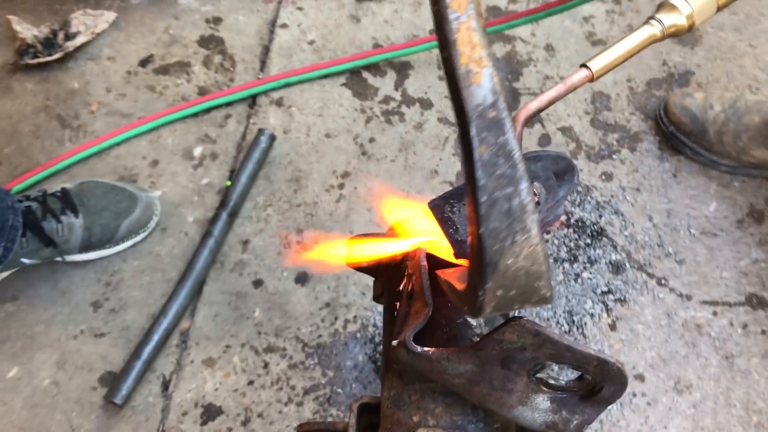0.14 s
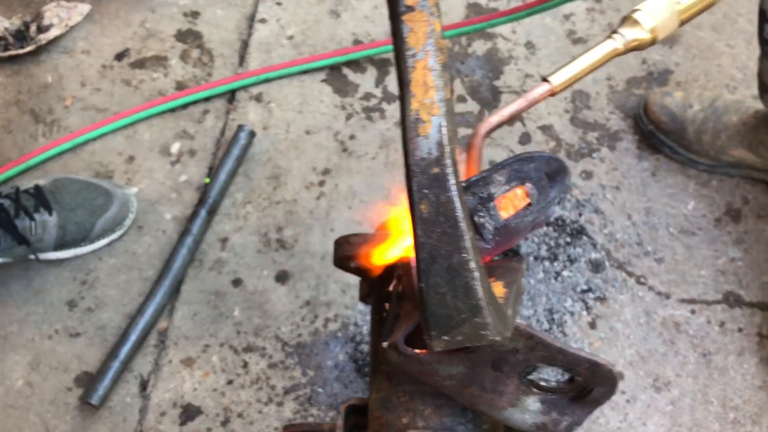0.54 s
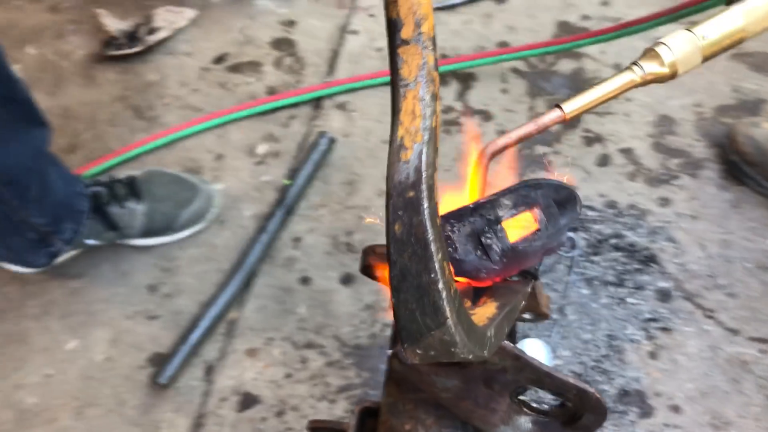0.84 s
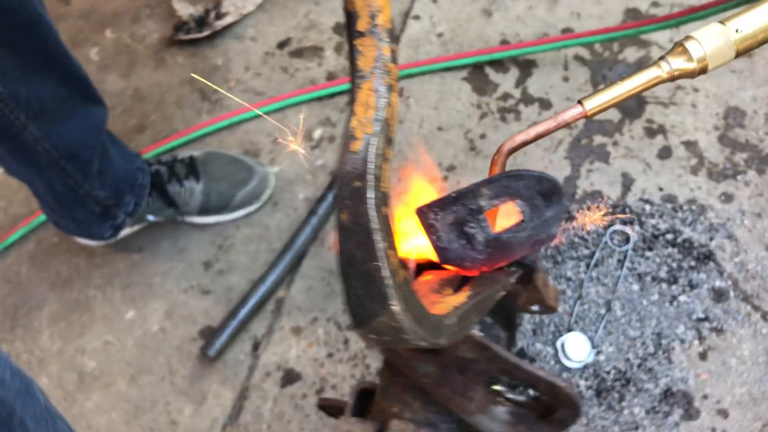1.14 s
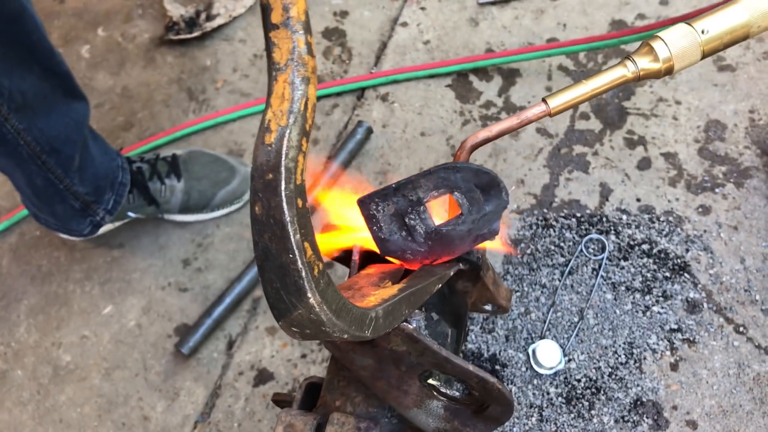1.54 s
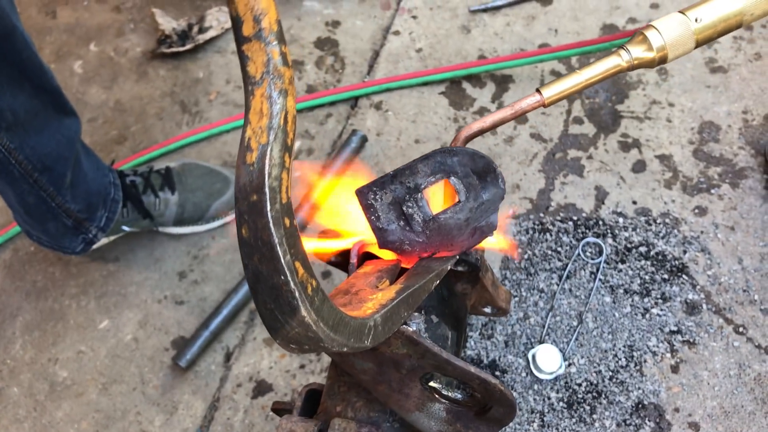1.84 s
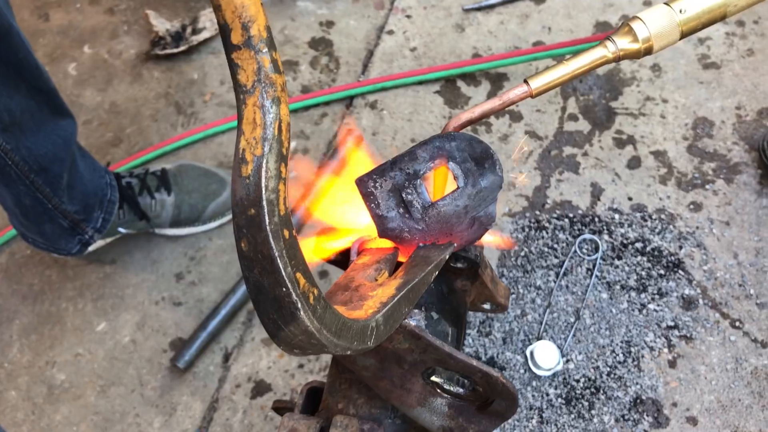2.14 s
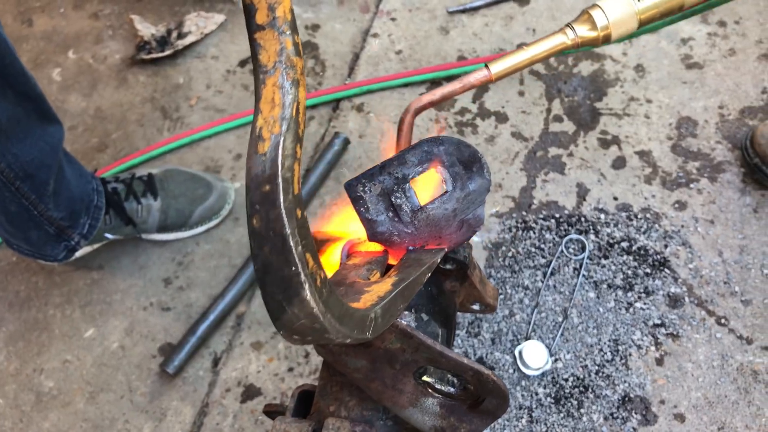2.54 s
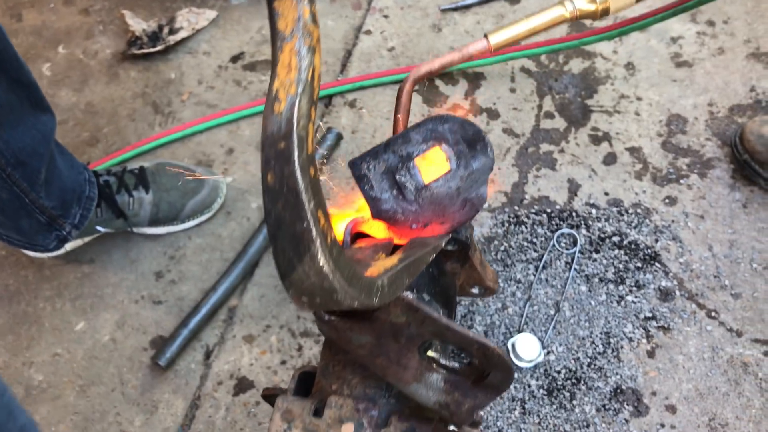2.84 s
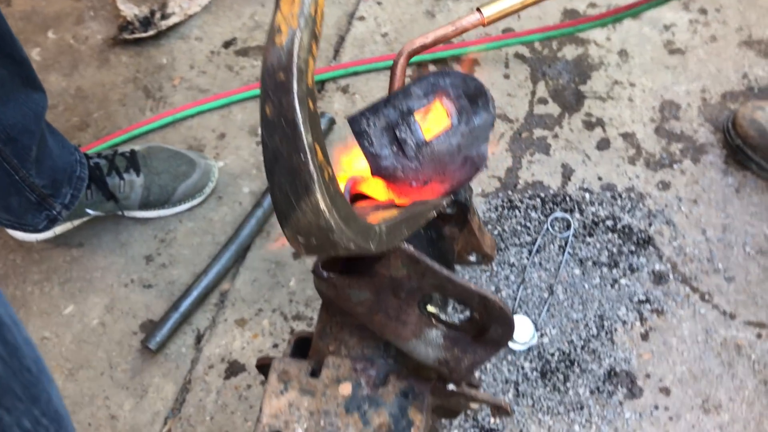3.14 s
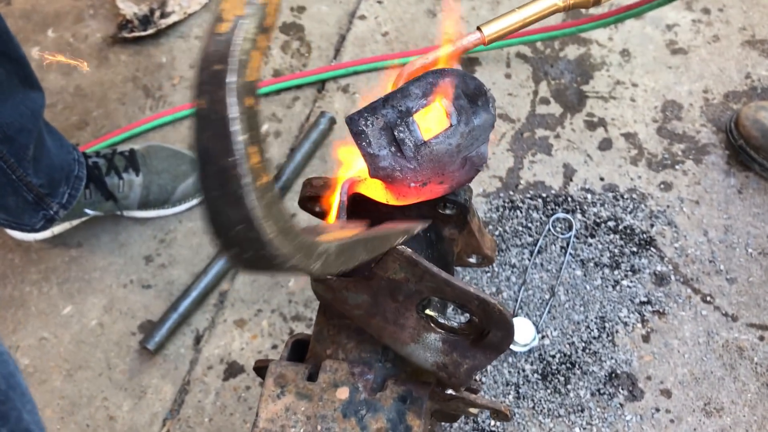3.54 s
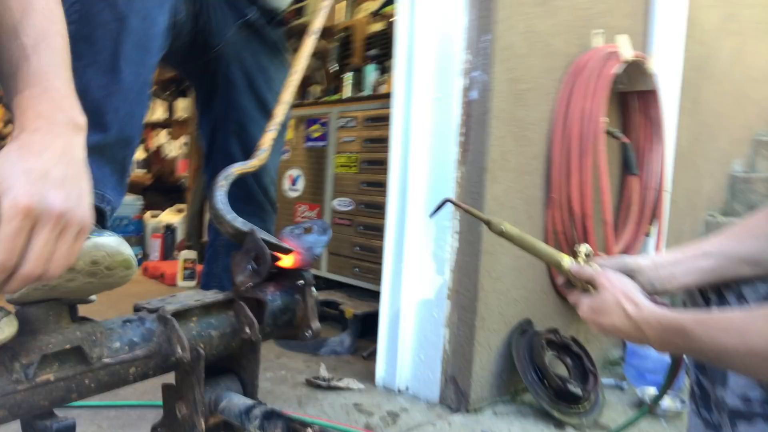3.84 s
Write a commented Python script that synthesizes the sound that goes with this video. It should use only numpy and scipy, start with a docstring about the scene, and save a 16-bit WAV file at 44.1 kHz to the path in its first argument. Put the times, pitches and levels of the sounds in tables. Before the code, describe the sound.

A gas torch flutters briefly, then swells into a bright hiss at 0.2 seconds, wavering as it heats steel. Hot scale spits near 0.8 and 1 second. The hiss dips around 1.3 seconds, and the flame pops several times until 2.2. From 3.5 seconds a pry bar knocks the steel a few times with short rings and low thuds. Everything cuts off at 3.9, leaving a quiet garage.

```python
"""A torch flame flutters and pops, then its gas jet swells to a hiss: an oxy-fuel torch is heating a steel
block in a garage. The hiss shifts in colour as the jet plays over the steel, the flame flutters where it is
pushed aside, and hot scale (the crust on the steel) crackles. A faint low tone comes and goes. A pry bar
knocks against the work a few times, ringing bar and block and shaking the vice. Then the sound cuts off
abruptly, leaving one tiny spit of scale and the quiet room."""
import sys
import numpy as np
from scipy import signal
from scipy.fft import rfft, irfft
from scipy.io import wavfile
from scipy.ndimage import uniform_filter1d

SR = 44100
rng = np.random.default_rng(int(sys.argv[2]) if len(sys.argv) > 2 else 0)


def dump(signal):
    """Clip the signal to [-1, 1] and save it as 16-bit WAV at the path in sys.argv[1]."""
    limited = np.clip(np.atleast_2d(signal).T, -1, 1)
    pcm = np.round(limited * 32767).astype(np.int16)
    wavfile.write(sys.argv[1], SR, pcm)


N = 176400

# how strongly the flame flutters, and when it pops: t/s, level/dB
FLUTTER_LEVELS = [(0,-58),(.04,-34),(.095,-44),(.12,-36.5),(.2,-56.5),(.61,-65),(.65,-43.5),(.79,-35),(.88,-56.5),(1.03,-49),(1.18,-56),(1.25,-44.5),(1.33,-55.5),(1.4,-45),(1.58,-52.5),(1.68,-39),(1.82,-43),(1.92,-72),(2.19,-51.5),(2.33,-54),(2.55,-42),(2.93,-36),(3.24,-39),(3.35,-58),(3.53,-39.5),(3.57,-53),(3.76,-54.5),(3.89,-39)]
FLAME_POPS = [(0.048,-33),(1.229,-39),(1.398,-32),(1.693,-31),(1.813,-32.5),(2.137,-36),(2.17,-35.5)]
# tone colour of the flutter and pops, the steady burn, the jet and the room: f/Hz, relative level/dB
FLAME_SPECTRUM = [(30,-23),(80,-4),(250,2.5),(450,2),(760,0),(850,-3.5),(960,4),(1490,0.5),(1560,-8),(2500,-9),(7000,-32)]
BURN_SPECTRUM = [(25,-45),(60,0),(90,-3),(150,-7.5),(850,-13.5),(980,-0.5),(1480,-0.5),(1570,-9.5),(2400,-2.5),(8000,-18)]
JET_SPECTRUM = [(200,-31),(1450,-15.5),(1600,-17),(1900,-12.5),(2700,-5),(3300,-2),(5600,-1),(7800,-1),(9500,2.5),(10400,-4.5),(10900,1),(13000,3),(15800,-3)]
ROOM_SPECTRUM = [(30,-17),(90,-7),(1550,-11.5),(2500,-24),(14000,-35)]
# loudness of the hiss below 7.5 kHz, from 7.5 to 10.9 kHz, and above: t/s, level/dB
HISS_LOW_LEVELS = [(0,-56),(.055,-48),(.13,-48),(.17,-34.5),(.3,-33),(.59,-32.5),(.66,-42.5),(.76,-39.5),(.87,-32.5),(.97,-34.5),(1.01,-38),(1.12,-34),(1.28,-45.5),(1.39,-44.5),(1.43,-37.5),(1.46,-32),(1.49,-36.5),(1.66,-41),(1.79,-38),(1.84,-32),(2.12,-29.5),(2.4,-33.5),(2.96,-30),(3.25,-33),(3.49,-41),(3.65,-33),(3.89,-32)]
HISS_MID_LEVELS = [(0,-56),(.11,-54),(.17,-36),(.29,-33),(.39,-41),(.58,-36.5),(.65,-44),(.87,-33.5),(1,-41.5),(1.1,-37),(1.27,-50.5),(1.38,-51),(1.45,-39.5),(1.5,-44),(1.7,-47),(1.85,-36.5),(2.08,-29.5),(2.48,-38),(2.59,-31.5),(2.63,-36.5),(2.76,-31),(3.17,-33.5),(3.24,-37),(3.52,-42),(3.63,-32),(3.69,-40),(3.77,-31.5),(3.89,-40)]
HISS_TOP_LEVELS = [(0,-57),(.1,-48),(.17,-35.5),(.34,-36),(.4,-41),(.56,-35.5),(.65,-42.5),(.72,-33),(.86,-30.5),(.99,-38),(1.08,-30),(1.28,-48),(1.39,-38.5),(1.45,-26.5),(1.49,-38),(1.57,-32.5),(1.63,-41.5),(1.77,-40),(1.83,-30.5),(2,-38.5),(2.3,-30),(2.45,-40),(2.59,-32),(2.64,-38.5),(2.9,-31),(3.24,-40),(3.35,-31.5),(3.52,-40),(3.64,-32),(3.7,-34.5),(3.89,-36.5)]
# lift below 4.6 kHz that makes the hiss fuller or thinner: t/s, relative level/dB
HISS_FULLNESS = [(.3,-0.5),(.5,2),(1,0),(2.05,-3),(2.5,-1.5),(3.35,3),(3.6,0.5)]
# spits of hot scale: t/s, level/dB, decay/s
SCALE_SPITS = [(0.789,-22,0.0087),(.972,-22,.001),(0.982,-25,0.0022),(3.965,-60,.003)]
# knocks: t/s, part that rings, ring gain/dB, favoured f/Hz, width around it/octaves, crack level/dB
BAR_KNOCKS = [(3.472,"bar",-29.5,1140,0.075,-35.5),(3.473,"bar",-26.5,5400,0.71,-31.5),(3.505,"block",-28.5,1920,0.15,-45),(3.652,"block",-27.5,1230,0.77,-28.5),(3.651,"block",-39,293,0.81,-34.5),(3.799,"bar",-28,2850,0.42,-27.5),(3.801,"bar",-31.5,1050,0.62,-32.5),(3.83,"bar",-35,1590,0.71,-33)]
# natural tones of the bar and of the clamped block: f/Hz, relative level/dB, time to fall 60 dB/s
BAR_TONES = [(511,6,0.27),(890,-1,0.21),(1020,-1,.17),(1124,1.5,.08),(1272,-5,.16),(2568,0,0.11),(3258,-1,0.2),(5500,-4,.09)]
BLOCK_TONES = [(275,3,0.15),(690,-2,0.13),(892,-3,0.11),(908,2,0.2),(1490,-9,0.25),(1585,4,0.094),(1770,-12,0.44),(2100,-5,0.17)]
# shudders of the vice: t/s, gain/dB, decay/s
VICE_SHUDDERS = [(3.474,-47,.12),(3.662,-29,0.013),(3.804,-35,0.023)]

SUDDEN_CUT_S, TOP_HZ = 3.901, 15800


def undb(db):
    """Turn decibels into a number to multiply by."""
    return 10 ** (np.asarray(db) / 20)


def unit(x):
    """Scale a signal so its average strength (rms) is 1."""
    return x / np.sqrt(np.mean(x ** 2))


def clock():
    """Time of every sample in seconds."""
    return np.arange(N) / SR


def octaves():
    """Pitch of every point in a spectrum, in octaves above 1 Hz."""
    return np.log2(np.maximum(np.arange(N // 2 + 1) * SR / N, 1))


def colour(x, points):
    """Give a sound the tone colour of an (f/Hz, level/dB) table, at strength 1."""
    hz, db = np.array(points).T
    gains = undb(np.interp(octaves(), np.log2(hz), db))
    cepstrum = irfft(np.log(gains), N)
    # folding this in half makes the filter ring only after a sound, never before
    cepstrum[1:N // 2] *= 2
    cepstrum[N // 2 + 1:] = 0
    return unit(irfft(rfft(x) * np.exp(rfft(cepstrum)), N))


def curve(table):
    """Gain over time, following a (t/s, level/dB) table."""
    return undb(np.interp(clock(), *np.array(table).T))


def noise():
    """White noise."""
    return rng.standard_normal(N)


def wander(rate_hz):
    """Glide between random values, at strength 1."""
    return unit(np.interp(clock() * rate_hz, np.arange(N), noise()))


def fade(start_s, decay_s):
    """Jump to 1, then die away."""
    age = clock() - start_s
    return (age >= 0) * np.exp(-np.clip(age / decay_s, 0, 60))


def flame():
    """Pushed aside, the flame flaps quickly and pops, over its steady burn."""
    flaps = undb(2 * wander(220) + 0.23 * wander(45))
    flutter = colour(noise() * flaps, FLAME_SPECTRUM) * curve(FLUTTER_LEVELS)
    pop_levels = sum(undb(db) * fade(start, decay_s=0.0053) for start, db in FLAME_POPS)
    pops = colour(noise(), FLAME_SPECTRUM) * pop_levels
    burn = undb(-47 + 1.5 * wander(6.3)) * colour(noise(), BURN_SPECTRUM)
    return flutter + pops + burn


def crackle(per_second, spread_db):
    """Fine crackle: random clicks, mostly small and a few large."""
    clicks = rng.random(N) < per_second / SR
    sizes = undb(spread_db * np.minimum(rng.exponential(size=N), np.pi))
    return unit(clicks * sizes)


def gas_jet():
    """Swirling gas hisses, its colour shifting as it plays over the steel."""
    flicker = undb(0.8 * wander(60) + 1.13 * wander(1100))
    gas = unit(noise() * flicker) + undb(-19.5) * crackle(per_second=160, spread_db=5)
    spectrum, pitch = rfft(colour(gas, JET_SPECTRUM)), octaves()
    # narrow bands each drift louder and softer on their own
    centres = np.log2(np.geomspace(2000, TOP_HZ, num=32))
    narrow_bands = (np.interp(pitch, centres, row) for row in np.eye(len(centres)))
    hiss = sum(irfft(spectrum * band, N) * undb(1.48 * wander(20)) for band in narrow_bands)
    # soft dividing lines: 0 below each frequency, 1 above it
    above_body, above_low, above_mid = (
        .5 + .5 * np.tanh((pitch - np.log2(hz)) / 0.11) for hz in (4600, 7500, 10900))
    body = irfft(rfft(hiss) * (1 - above_body), N)
    hiss = hiss + body * (curve(HISS_FULLNESS) - 1)
    wide_bands = [(1 - above_low, HISS_LOW_LEVELS),
                  (above_low - above_mid, HISS_MID_LEVELS),
                  (above_mid, HISS_TOP_LEVELS)]
    return sum(unit(irfft(rfft(hiss) * band, N)) * curve(levels) for band, levels in wide_bands)


def reflections(x):
    """Add quick echoes from the concrete floor and nearby things."""
    echo = noise() * fade(0, decay_s=0.0075) * (1 - fade(0, decay_s=0.0053))
    return x + undb(-8) * signal.fftconvolve(x, echo / np.linalg.norm(echo))[:N]


def scale_spits():
    """Short bright bursts as scale jumps off the hot steel."""
    bursts = sum(undb(db) * fade(start, decay) for start, db, decay in SCALE_SPITS)
    return colour(noise(), JET_SPECTRUM) * bursts


def drone(start_s, end_s):
    """A faint low tone that wavers in pitch and loudness."""
    t = clock()
    pitch_hz = 90 * (1 + 0.054 * wander(20))
    tone = np.sin(2 * np.pi * np.cumsum(pitch_hz) / SR) * undb(2 * wander(20.7))
    level = undb(-56.5) * ((t > start_s) & (t < end_s))
    return unit(tone) * uniform_filter1d(level, size=SR // 25)  # soften the start and end


def ring(start_s, hz, decay_s):
    """One natural tone of a struck object, dying away."""
    return fade(start_s, decay_s) * np.sin(2 * np.pi * hz * (clock() - start_s))


def pry_bar():
    """Each knock cracks and rings the bar or block; the contact favours some pitches over others."""
    knocks = 0
    for start, part, ring_db, centre_hz, width, crack_db in BAR_KNOCKS:
        contact = lambda pitch: np.exp(-.5 * ((pitch - np.log2(centre_hz)) / width) ** 2)
        tones = BAR_TONES if part == "bar" else BLOCK_TONES
        ringing = sum(undb(db) * contact(np.log2(hz)) * ring(start, hz, fall_s / np.log(1000))
                      for hz, db, fall_s in tones)
        crack = unit(irfft(rfft(noise()) * contact(octaves()), N)) * fade(start, decay_s=0.018)
        knocks = knocks + undb(ring_db) * ringing + undb(crack_db) * crack
    return knocks


def vice(stand_hz=93, rise_s=0.0089):
    """After a hard knock the vice shudders on its stand: one low tone that swells and dies."""
    return sum(undb(db) * (1 - fade(start, rise_s)) * ring(start, stand_hz, decay)
               for start, db, decay in VICE_SHUDDERS)


def room_tone():
    """The soft rush of the quiet garage, heard once the sound cuts off abruptly."""
    return undb(-64.5) * colour(noise(), ROOM_SPECTRUM)


def scene():
    """Torch and knock sounds cut off together; scale and room carry on. Left and right are the same."""
    cut_fade = fade(SUDDEN_CUT_S, decay_s=0.00093) + undb(-1) * fade(SUDDEN_CUT_S, decay_s=0.0029)
    gain = np.where(clock() < SUDDEN_CUT_S, 1, cut_fade)
    torch = flame() + reflections(gas_jet())
    work = torch + drone(start_s=2.14, end_s=2.497) + pry_bar() + vice()
    return np.tile(work * gain + scale_spits() + room_tone(), (2, 1))


def record(dry):
    """Thin the bass below 31 Hz and cut the highest treble."""
    bass_cut = signal.butter(3, 31, "high", fs=SR, output="sos")
    treble_cut = signal.ellip(10, .2, 80, TOP_HZ, fs=SR, output="sos")
    return signal.sosfilt(treble_cut, signal.sosfilt(bass_cut, dry))


dry = scene()
out = record(dry)
dump(out)
```